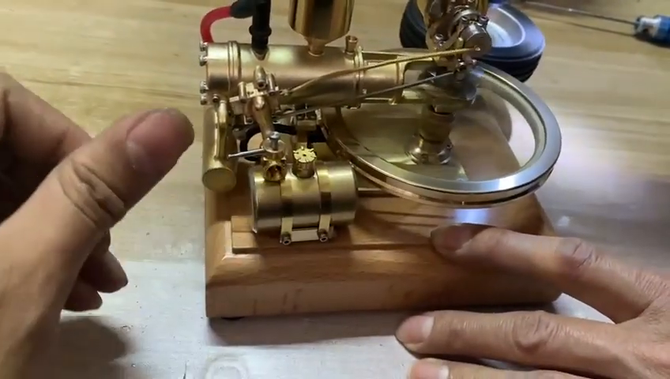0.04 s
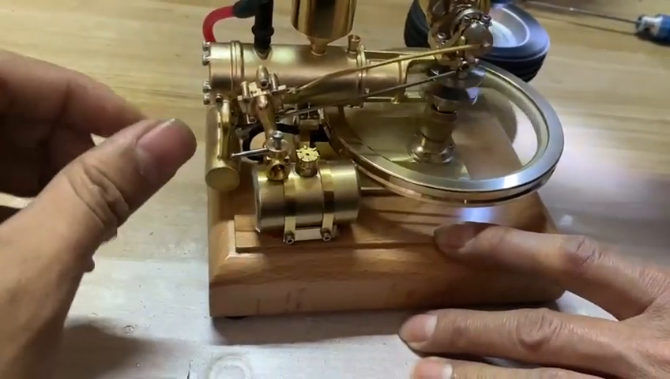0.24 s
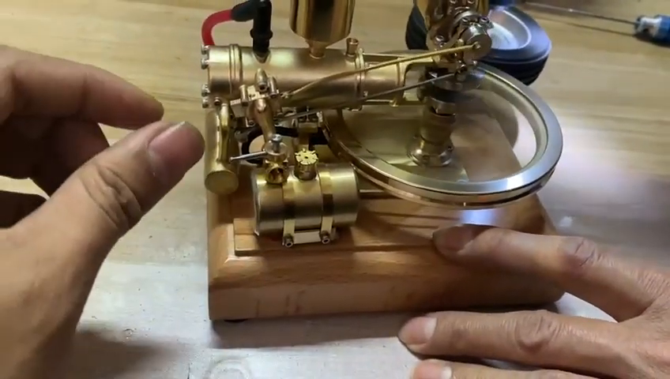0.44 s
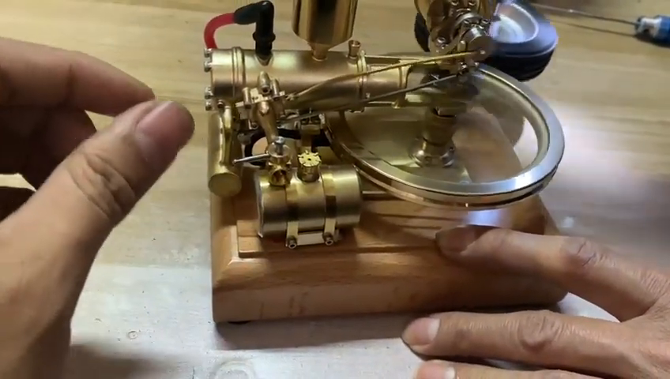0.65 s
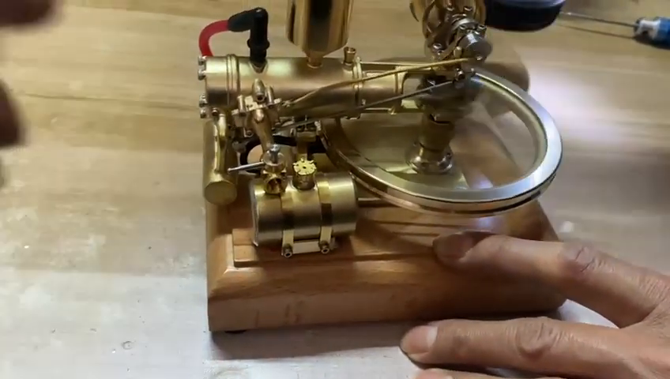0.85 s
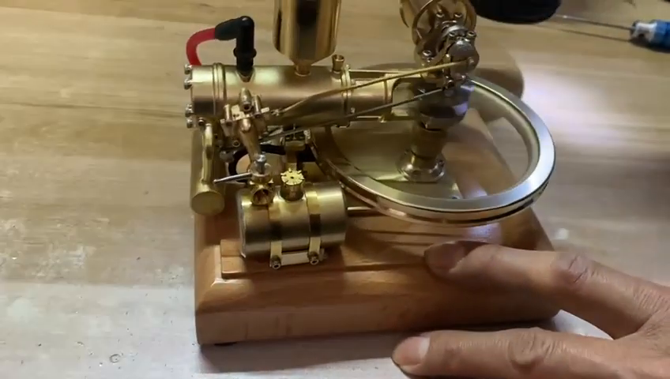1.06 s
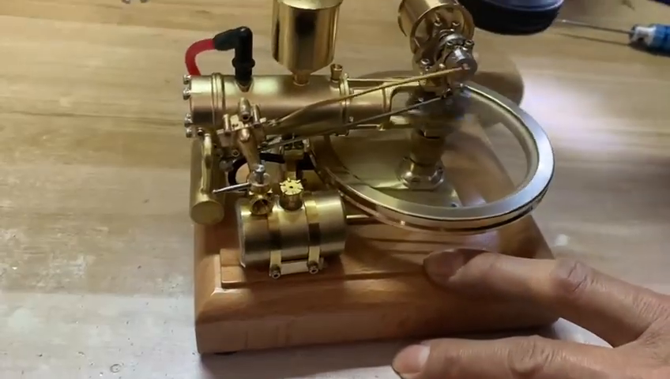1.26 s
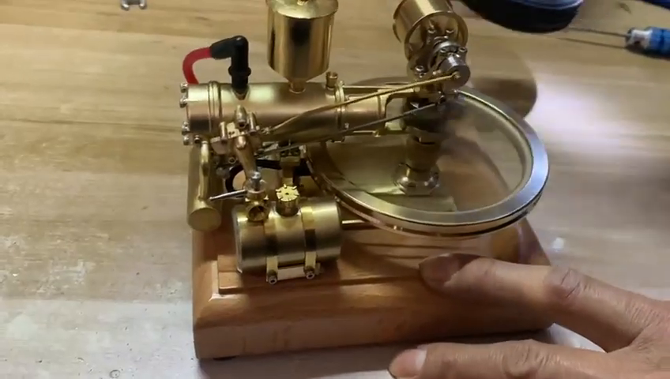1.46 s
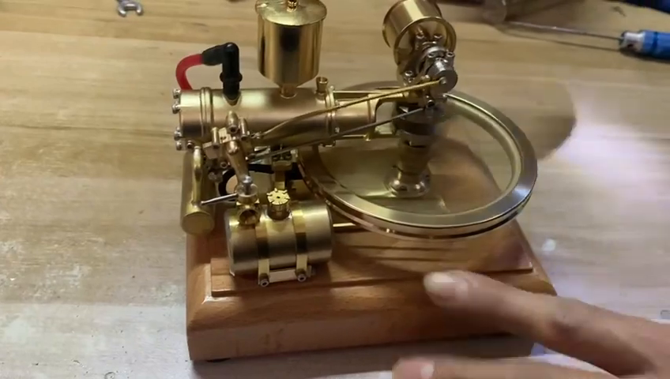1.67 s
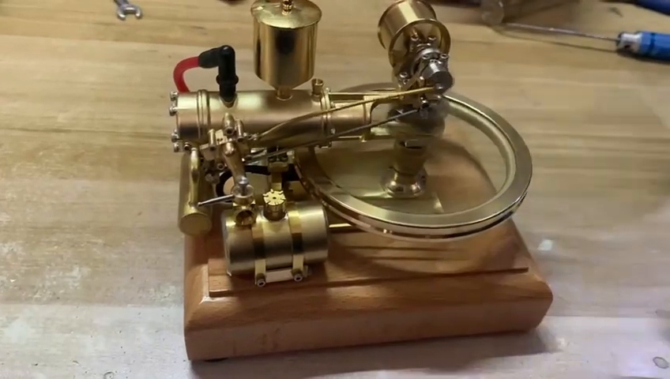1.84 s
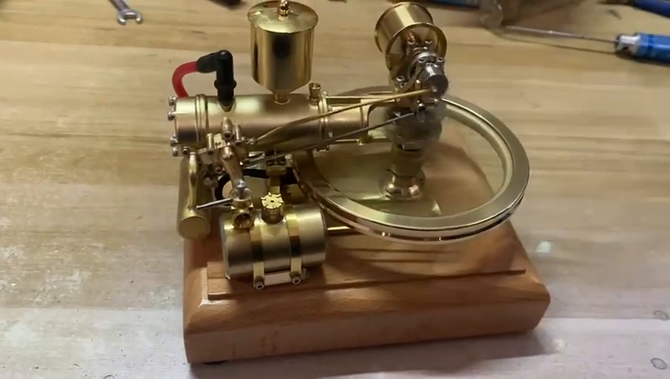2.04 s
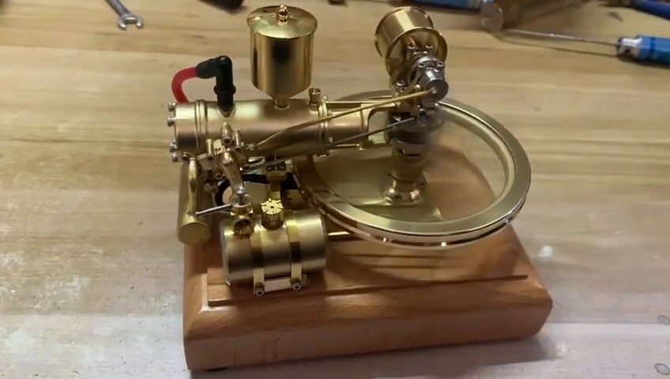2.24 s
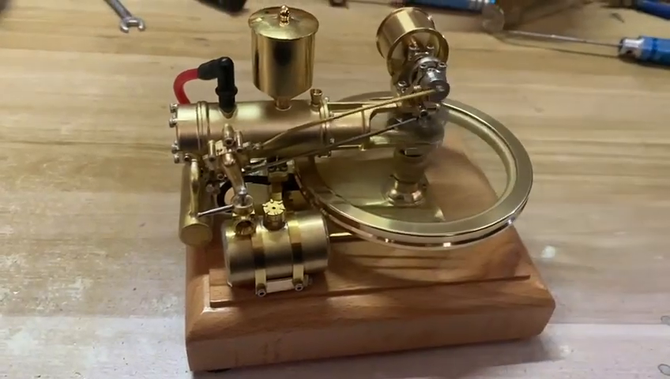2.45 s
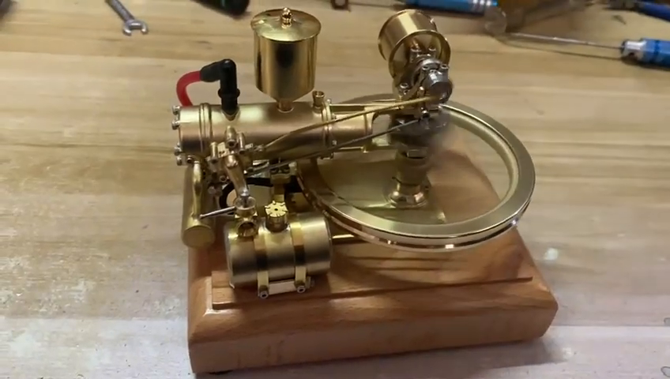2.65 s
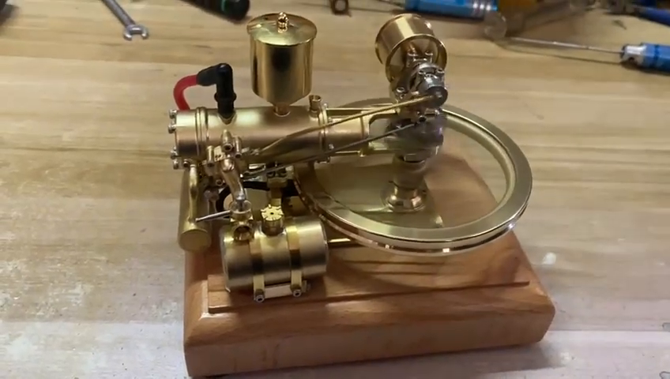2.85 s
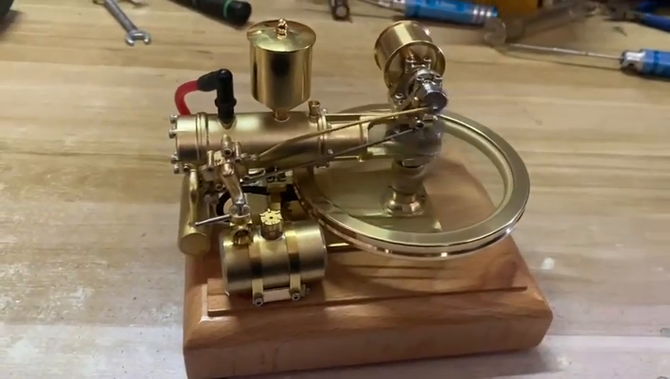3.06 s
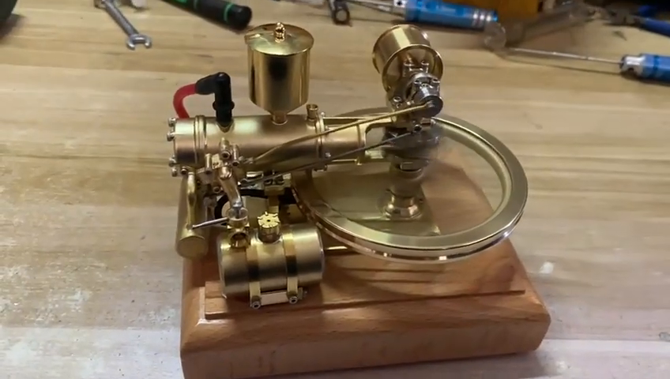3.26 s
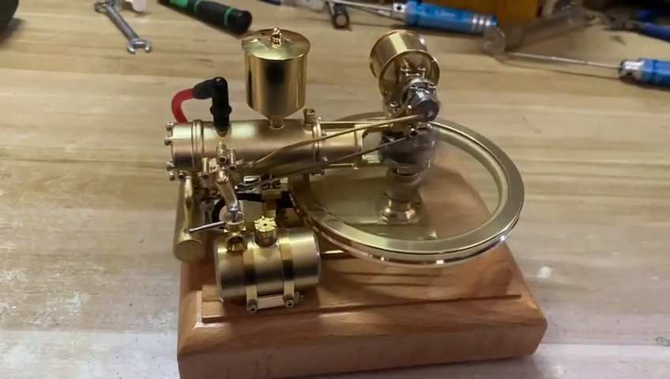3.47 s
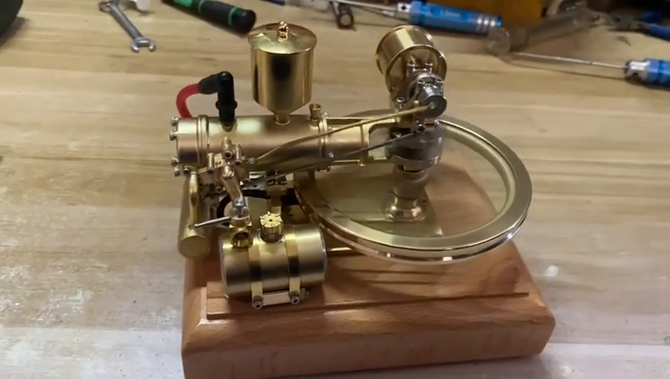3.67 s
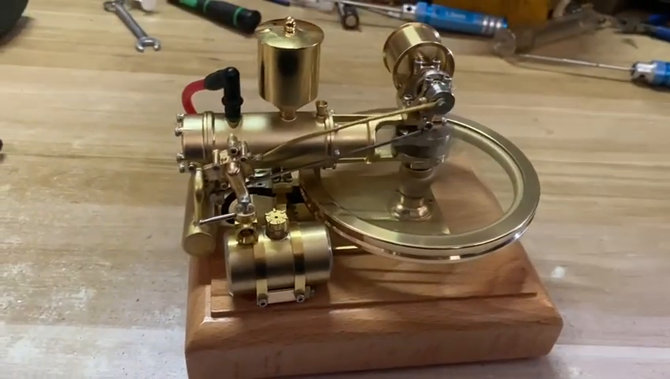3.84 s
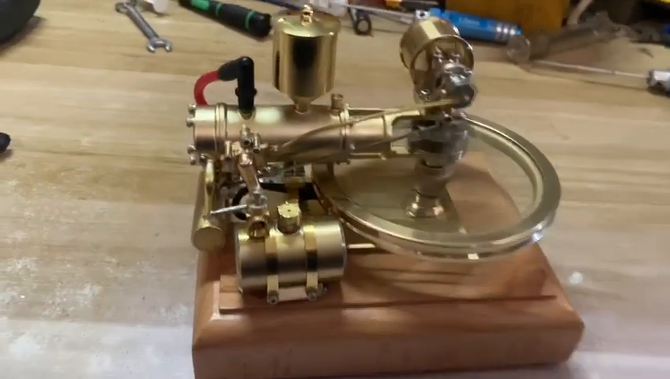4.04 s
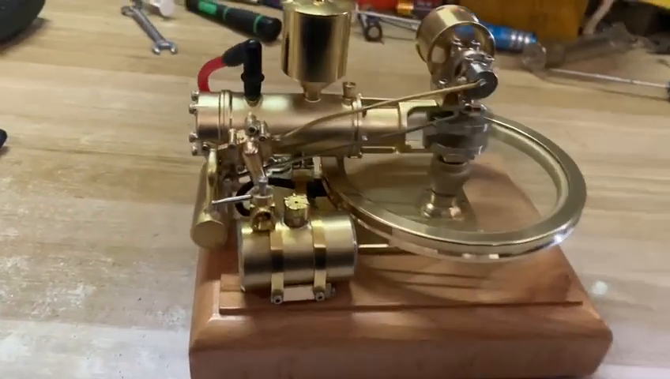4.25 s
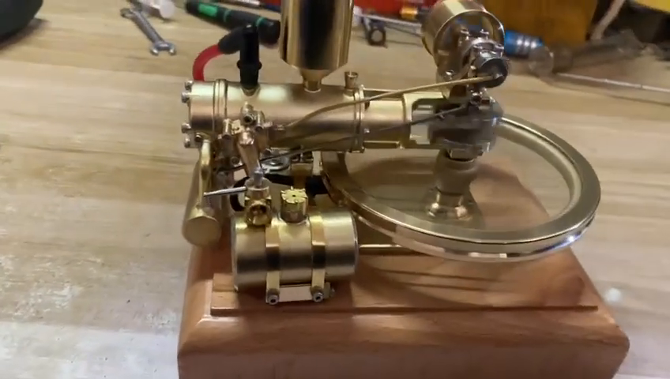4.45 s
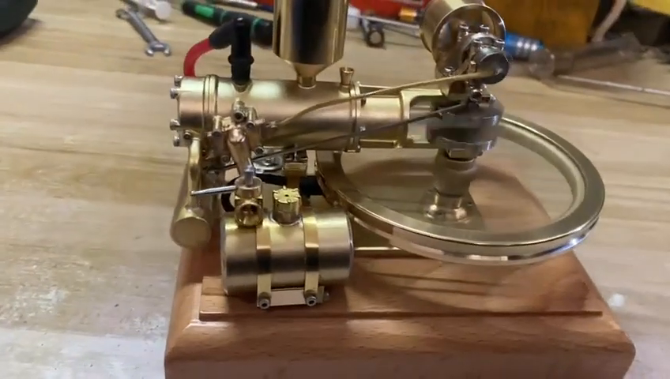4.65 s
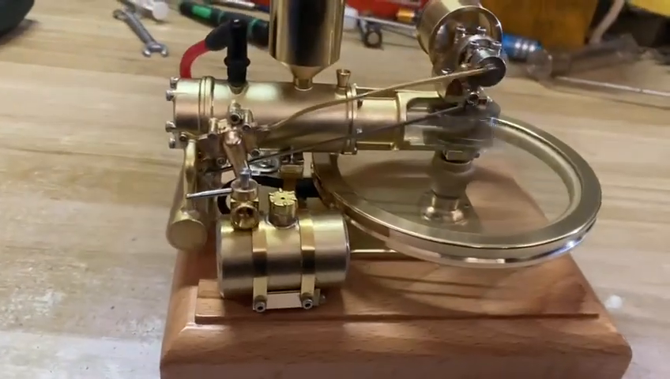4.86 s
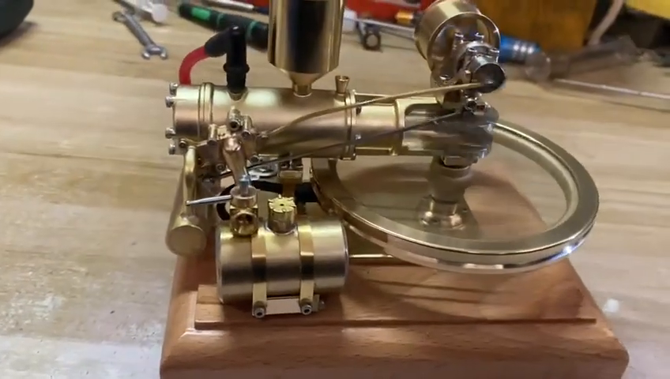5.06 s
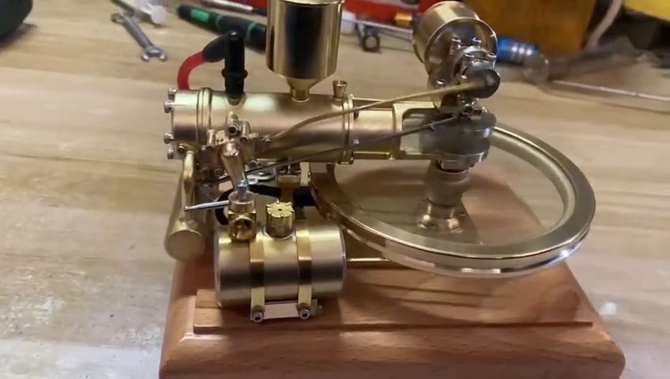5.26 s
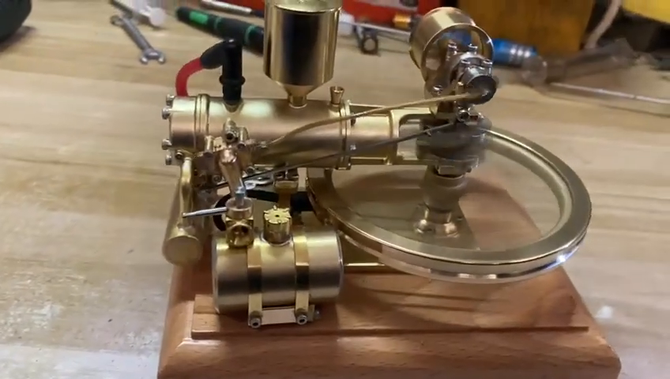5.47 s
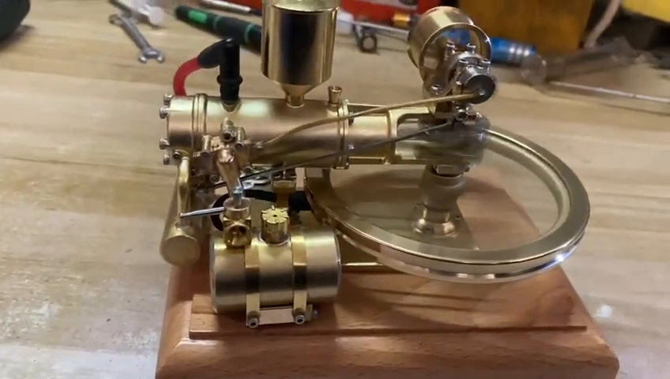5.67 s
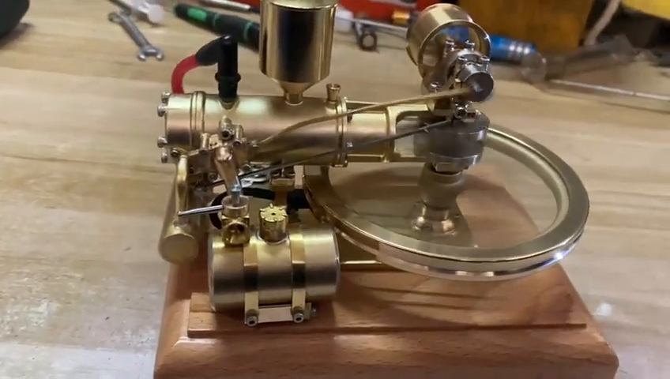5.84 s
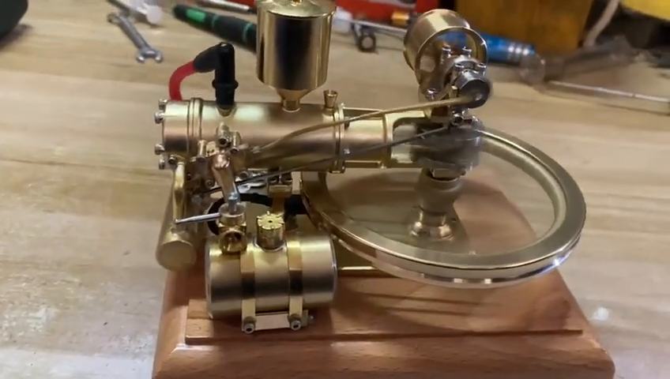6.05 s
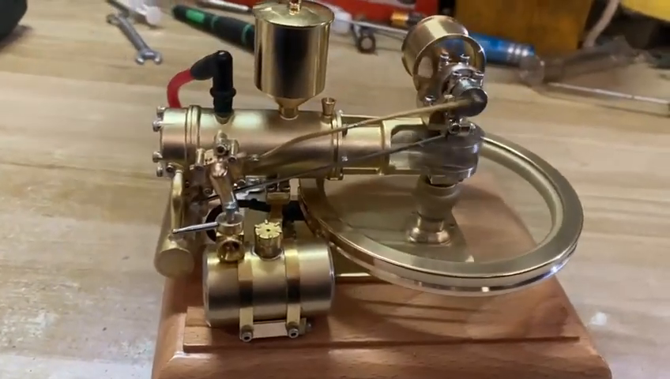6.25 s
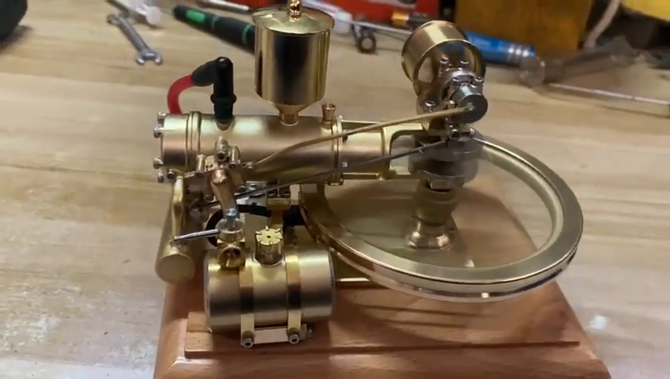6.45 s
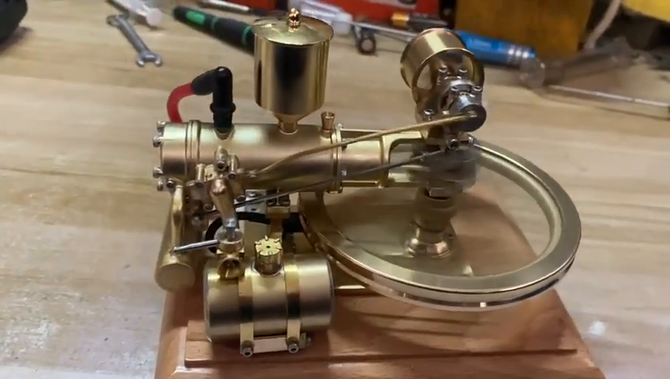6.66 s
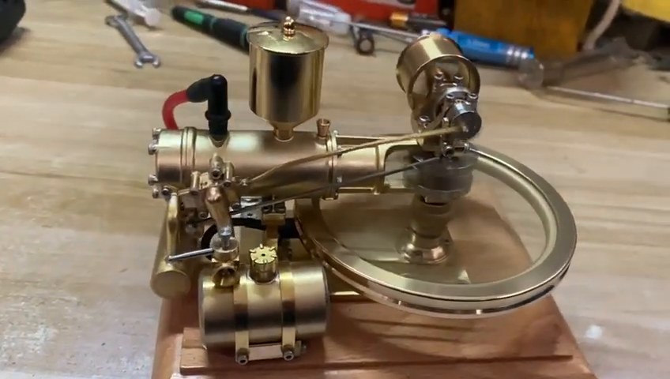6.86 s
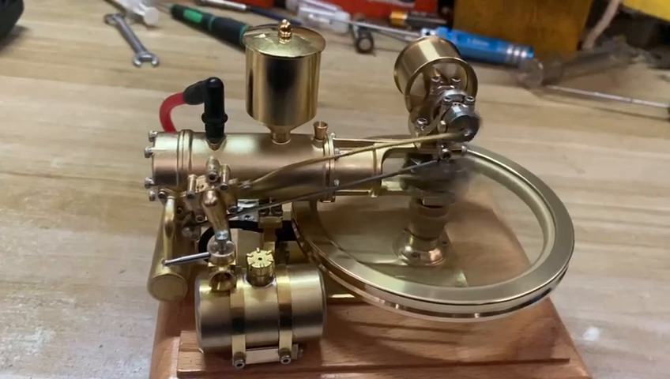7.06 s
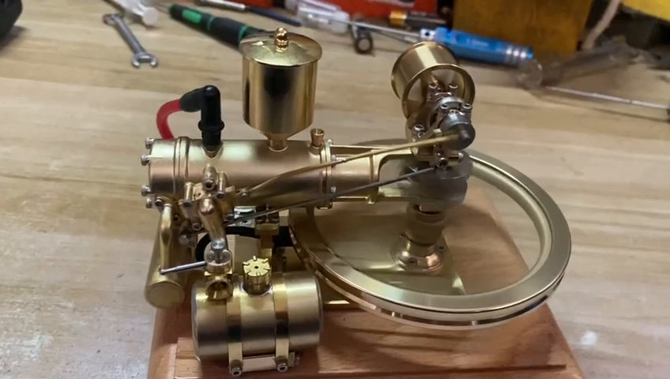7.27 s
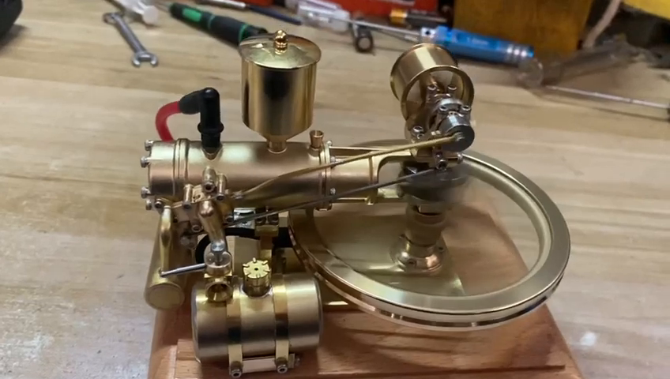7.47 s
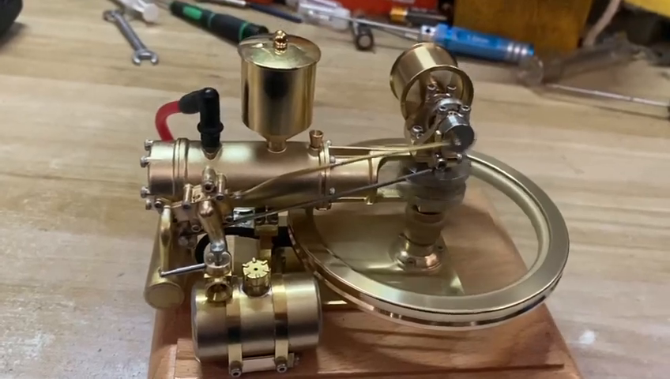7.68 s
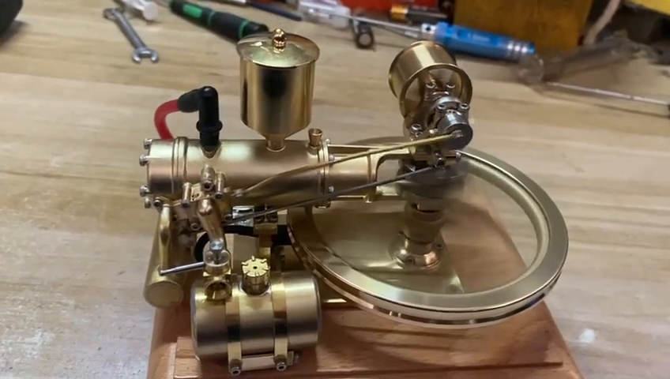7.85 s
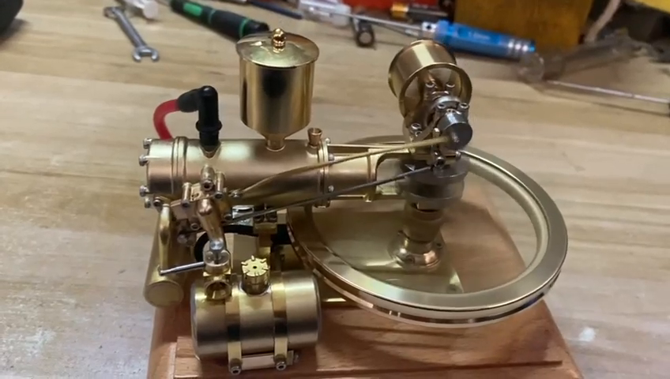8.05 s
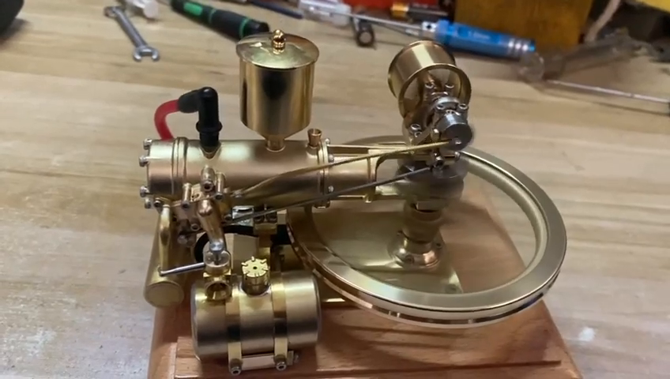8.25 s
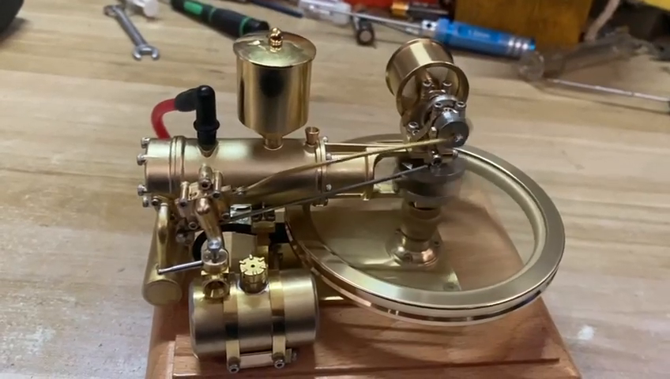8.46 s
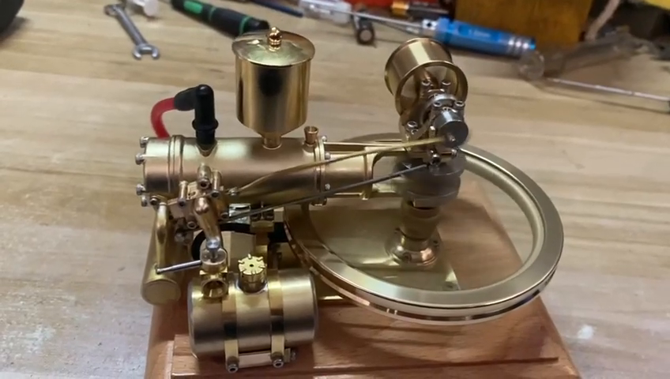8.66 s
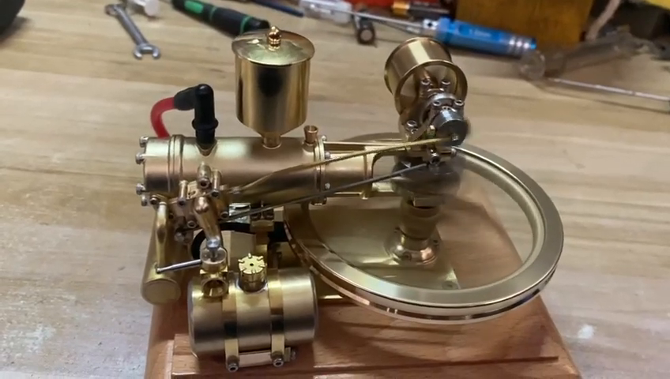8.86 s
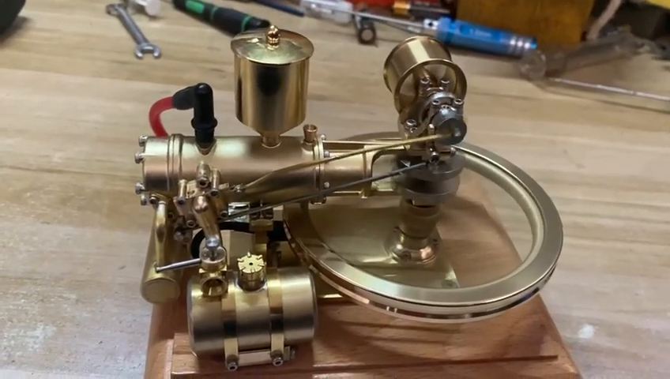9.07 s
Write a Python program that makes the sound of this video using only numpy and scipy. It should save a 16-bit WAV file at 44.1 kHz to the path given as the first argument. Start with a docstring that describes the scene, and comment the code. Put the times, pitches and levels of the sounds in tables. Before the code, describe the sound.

An electric starter whines and stops as a miniature four-stroke engine catches, its sharp exhaust pops quickening into a steady, ticking chug.

```python
"""Model engine on a wooden bench

A small brass four-stroke gathers speed, close to a two-port microphone. Each crank turn gives
an exhaust pop (loud when it fires), a valve clack and a puff of air. Nearby, an electric hand
tool whines and brakes to a halt at about 1.3 s. A few knocks ring the bench in the first half."""
import sys
import numpy as np
from scipy import signal
from scipy.fft import rfft, irfft, next_fast_len
from scipy.io import wavfile
from scipy.ndimage import uniform_filter1d, map_coordinates

SR = 44100
rng = np.random.default_rng(int(sys.argv[2]) if len(sys.argv) > 2 else 0)


def int16_out(signal):
    """Quantize to a 16-bit WAV file."""
    q = np.round(np.clip(np.atleast_2d(signal).T, -1, 1) * 32767)
    wavfile.write(sys.argv[1], SR, q.astype(np.int16))


N = 401751
TIME = np.arange(N) / SR


def amp(db):
    return 10 ** (np.asarray(db) / 20)


def unit(x):
    return x / np.sqrt(np.mean(x ** 2) + 1e-20)


def along(points, hz):
    """Interpolate (f/Hz, value) points on a log axis."""
    f, v = np.transpose(points)
    return np.interp(np.log(hz + 1), np.log(f + 1), v)


def curves(rows):
    """One value per sample for each column after the time."""
    s, *cols = np.transpose(rows)
    return [np.interp(TIME, s, c) for c in cols]


def wobble(rate):
    """A smooth random curve, rate knots a second."""
    return map_coordinates(rng.standard_normal(int(N * rate / SR) + 4), [TIME * rate])


def filtered(x, response):
    """Pass x through a complex response of frequency."""
    m = next_fast_len(N + SR // 2)
    return irfft(rfft(x, m) * response(np.fft.rfftfreq(m, 1 / SR)), m)[..., :N]


def modes(table):
    """Causal resonances with alternating signs, from rows of f/Hz, width/Hz, level/dB."""
    return lambda f: sum((-1) ** k * amp(db) * 1j * f * width / (hz * hz - f * f + 1j * f * width)
                         for k, (hz, width, db) in enumerate(table))


def lag(f, late, cycles=0):
    """A delay in seconds plus one that holds low tones back by some cycles."""
    return np.exp(-2j * np.pi * (f * late + cycles * np.log(f + 30)))


def noise(spectrum):
    """Coloured noise of rms 1."""
    return unit(filtered(rng.standard_normal(N), lambda hz: amp(along(spectrum, hz))))


def ringing_noise(table):
    """Noise through resonances, rms 1."""
    return unit(filtered(rng.standard_normal(N), modes(table)))


def impulses(times, sizes):
    """Single-sample blows at times in seconds."""
    out = np.zeros(N)
    out[(times * SR).astype(int)] = sizes
    return out


def hump(phase, start, peak, end):
    """A window within each turn; it opens abruptly if peak lies before start."""
    return np.sin(np.pi / 2 * np.interp(phase % 1, [start, peak, end], [0, 1, 0])) ** 2


# Broad noise of the background and of the gears: f/Hz, density/dB
WHIRR_SPECTRUM = [(40, -7.5), (200, -8.5), (1000, -4.5), (2000, -8), (2600, -15), (4500, -10.5),
                  (6500, -10), (8700, -25), (10500, -10.5), (15300, -22), (16200, -50)]

def noise_floor():
    """A faint steady hiss, independent in each channel."""
    return amp(-49) * np.array([noise(WHIRR_SPECTRUM), noise(WHIRR_SPECTRUM)])


# Decay of the room, and of the bench top and clutter near the microphone: f/Hz, t60/s
ROOM_DECAY = [(100, 0.064), (1000, 0.39), (10000, 0.14)]
NEAR_DECAY = [(100, 0.0096), (1000, 0.043), (10000, 0.0071)]

def reflections(x, decay):
    """Diffuse stereo reflections in which each frequency dies at its own speed."""
    hz, t, spectra = signal.stft(rng.standard_normal((2, SR // 2)), SR, nperseg=256)
    tail = signal.istft(spectra * amp(-60 * t / along(decay, hz)[:, None]), SR, nperseg=256)[1]
    delayed = np.pad(x, (120, 0))[None]
    return signal.fftconvolve(delayed, tail / np.linalg.norm(tail[0]), axes=1)[:, :N]


# Blows on the bench: t/s, level/dB, relative crack level/dB
BLOWS = [(0.45, -26, -14), (0.798, -24, -14), (2.462, -6.5, -2), (2.471, -0.5, -15.5), (2.544, -15.5, -8),
         (2.751, -19, -12), (2.809, -35, -14), (4.137, -23, -14)]
# Modes of the wooden top: f/Hz, level/dB, t60/s
BENCH_MODES = [(60.6, -7, 0.062), (85.3, 0.5, 0.15), (131, -5.5, 0.12), (187, -1.5, 0.067),
               (305.6, -12, 0.17), (586, -8, 0.048), (778, -14.5, 0.11)]

def bench_knocks():
    """Soft blows ring the bench top; the contact gives a short crack and a duller rattle."""
    out, t = np.zeros(N + SR), np.arange(SR // 2) / SR
    attack = 1 - np.exp(-t / 0.00051)
    dull_noise = lambda size: uniform_filter1d(rng.standard_normal(len(t)), size)
    for s, db, crack_db in BLOWS:
        ring = sum(amp(level + rng.normal(0, 0.85) - 60 * t / t60) * np.sin(2 * np.pi * hz * t)
                   for hz, level, t60 in BENCH_MODES)
        crack = dull_noise(5) * amp(crack_db + 11 - 60 * t / 0.011)
        rattle = dull_noise(18) * amp(crack_db + 13.5 - 60 * t / 0.095)
        out[round(s * SR):][:len(t)] += amp(db - 6) * (ring + crack + rattle) * attack
    return filtered(out[:N], lambda f: lag(f, -0.00115, 0.45))


# The tool's motor before braking: t/s, rotation f/Hz, level/dB
MOTOR_RUN = [(0, 428.5, -24.5), (.19, 428.8, -24.5), (.28, 433.5, -24.5), (.38, 433.3, -24.5),
             (.54, 430.6, -24.7), (.9, 432.3, -26.5), (1.2, 433, -26.3)]

def tool_motion():
    """Motor speed, overall level and relative whine level: steady, then braked and fading out."""
    brake_s, whine_end_s, halt_s, rattle_end_s = 1.257, 1.289, 1.312, 1.355
    since = lambda s: np.maximum(TIME - s, 0)
    hz, db = curves(MOTOR_RUN)
    hz = np.maximum(hz - 3500 * since(brake_s), 110)
    swell_db = 3.5 * np.minimum(since(brake_s) / (halt_s - brake_s), 1)
    rattle_db = -43 - 1700 * since(rattle_end_s)
    db = np.maximum(db + swell_db - 850 * since(halt_s), rattle_db)
    whine_db = 2.5 - np.minimum(1200 * since(whine_end_s), 60)
    return hz, db, whine_db


# Motor tones: multiple of the rotation rate, level/dB
MOTOR_ORDERS = [(1, -23), (3, -30), (4, -14), (5, -26), (6, -28), (8, -6.5), (11, -30), (19, -24)]
# Fan noise: f/Hz, density/dB
FAN_SPECTRUM = [(40, -17), (80, -6), (300, -12), (800, -7), (1500, -11), (2400, -8.5), (3800, -5.5),
                (5200, -9), (6500, -9), (7500, -8), (9500, -7), (12000, -8.5), (14000, -17), (15400, -16),
                (15900, -50)]
# Resonances of the housing and of the braking scrape: f/Hz, width/Hz, level/dB
HOUSING_MODES = [(1680, 160, 9), (3620, 270, -15), (4410, 100, 8), (6500, 320, 5), (8210, 150, 8.5),
                 (8320, 140, 6)]
SCRAPE_MODES = [(860, 69, 2), (2700, 130, 3.5), (4800, 580, -4)]

def hand_tool():
    """Nearby, a motor whines over fan noise in its housing; it breaks up and scrapes as it stops."""
    hz, db, whine_db = tool_motion()
    slowing = 1 - hz / hz.max()
    angle = 2 * np.pi * np.cumsum(hz * (1 + 0.05 * slowing * wobble(250))) / SR
    whine = np.zeros(N)
    for order, level in MOTOR_ORDERS:
        rms = amp(level + 0.7 * wobble(40.3) + 5.2 * slowing * (0.5 + wobble(72.4)))
        phase = order * (angle + 0.013 * wobble(62.5)) + rng.uniform(0, 7.8)
        whine += np.sqrt(2) * rms * np.sin(phase)
    chop = 1 + 0.27 * np.cos(angle)  # the commutator chops the noise once a turn
    fan = unit(filtered(chop * noise(FAN_SPECTRUM), lambda f: 1 + np.abs(modes(HOUSING_MODES)(f))))
    scrape = slowing * amp(4 + 3.5 * wobble(80)) * ringing_noise(SCRAPE_MODES)
    flutter = amp(wobble(20.15) + 0.54 * wobble(120))
    return amp(db) * (amp(whine_db) * whine + scrape + fan * flutter)


# Engine firings: t/s, pressure step into the muffler/dB, blow on the valve seat/dB
FIRING_STROKES = [(0.2005, 23.5, 10), (0.57, 19, 14), (0.9241, 11, 4), (1.1516, 23, 6), (1.3685, 9, 11),
                  (1.5764, 18, 6), (1.777, 14.5, 11), (1.9696, 18.5, 5), (2.1574, 12, 20),
                  (2.338, 15.5, 19), (2.5141, 23.5, 20), (2.6865, 24.5, 14), (2.8567, 25.5, 3),
                  (3.0245, 24.5, 5), (3.1916, 25.5, 11), (3.3554, 24, 10.5), (3.5188, 16.5, 17.5),
                  (3.681, 25, 6), (3.845, 26, 13.5), (4.0068, 26, 4), (4.1676, 23.5, 18),
                  (4.3266, 25.5, 19.5), (4.485, 22.5, 17), (4.641, 26.5, 4), (4.7962, 26, 8),
                  (4.95, 23.5, 16), (5.1025, 26, 12), (5.255, 26, 14), (5.4067, 25, 12), (5.5583, 26, 10),
                  (5.7089, 26, 19), (5.8586, 26, 13), (6.007, 26, 17), (6.155, 25.5, 7), (6.3029, 26, 16),
                  (6.5245, 18, 19), (6.6723, 26.5, 5), (6.819, 23, 18), (6.9671, 24.5, 9), (7.1154, 26, 13),
                  (7.261, 26, 10), (7.4077, 25, 10), (7.5525, 26, 7), (7.6975, 25, 13), (7.842, 24, 15),
                  (7.9866, 25.5, 6), (8.1294, 27, 4), (8.2714, 25, 11), (8.4137, 26.5, 6),
                  (8.5574, 24.5, 19), (8.699, 27, 6), (8.841, 26, 15), (8.9833, 26, 12)]
# Rough crank speed, which sets the whole turns between firings: t/s, f/Hz
CRANK_SPEED = [(0, 8), (2.5, 11.5), (5, 13), (9, 14)]

def crank():
    """Firing times (padded at both ends), the turns done by each, and the turns at every sample."""
    s = np.transpose(FIRING_STROKES)[0]
    turns_between = np.round(np.diff(s) * np.interp(s[1:], *np.transpose(CRANK_SPEED)))
    turns = np.cumsum(np.r_[0, 2, turns_between, 2])
    times = np.r_[s[0] - (s[1] - s[0]) * 2 / 3, s, 2 * s[-1] - s[-2]]
    return times, turns, np.interp(TIME, times, turns)


def by_speed(full_db, db_per_hz, at_s=None):
    """A level in dB that follows crank speed, at every sample or at the given times."""
    full_speed_hz = 14
    times, turns, _ = crank()
    speed_hz = np.interp(TIME, (times[1:] + times[:-1]) / 2, np.diff(turns) / np.diff(times))
    db = full_db + db_per_hz * (speed_hz - full_speed_hz)
    return db if at_s is None else db[(at_s * SR).astype(int)]


# Rushing gas at intake and exhaust: f/Hz, density/dB
GAS_SPECTRUM = [(150, -44), (500, -8), (1500, -26), (2500, -12.5), (4500, -10.5), (6000, -3), (7200, -4),
                (8700, -16.5), (10300, 4.5), (12200, -6), (13300, -1), (15300, -11.5), (16200, -47)]
# Resonances of the engine frame: f/Hz, width/Hz, level/dB
FRAME_MODES = [(56, 20, 4.5), (77, 26, 1.5), (200, 53, 3.5), (405, 620, -10), (726, 135, -6),
               (864, 80, -4.5), (1138, 120, 0), (1515, 66, -10.5), (1888, 84, -1.5), (3720, 200, -12.5)]

def valve_gear():
    """Once a turn the intake puffs and a tappet clacks against the frame."""
    _, turns, phase = crank()
    per_turn = lambda db: amp(db * rng.standard_normal(int(turns[-1]) + 1))[phase.astype(int)]
    intake = hump(phase, 0.27, 0.34, 0.61) + amp(-6) * hump(phase, 0.19, 0.15, 0.63)
    puff = per_turn(1.2) * intake * amp(2.8 * wobble(250)) * noise(GAS_SPECTRUM)
    taps = hump(phase, 0.206, 0.193, 0.37) * amp(1.7 * wobble(370)) * rng.standard_normal(N)
    clack = unit(filtered(per_turn(1.1) * taps, modes(FRAME_MODES)))
    return amp(by_speed(-28, 1.2)) * (puff + amp(-10.5) * clack)


# Hum of the bench under the engine: t/s, level/dB
BENCH_HUM = [(0, -56), (3.5, -56), (4.4, -49), (4.7, -42), (6.5, -41.5), (9.11, -40)]
# Resonances of the wooden base: f/Hz, width/Hz, level/dB
BASE_MODES = [(80.5, 14, -2.5), (190, 17, -6.5)]

def running_gear():
    """Gears whirr through the frame, the bench hums at four times crank speed, the base shakes."""
    _, _, phase = crank()
    whirr_db, (hum_db,) = by_speed(-36, 1.5), curves(BENCH_HUM)
    teeth = noise(WHIRR_SPECTRUM) * amp(3.04 * wobble(150))
    whirr = unit(filtered(teeth, lambda f: amp(-10) + np.abs(modes(FRAME_MODES)(f))))
    whirr *= amp(whirr_db + 0.72 * wobble(30) + 0.66 * np.cos(2 * np.pi * (phase - 0.4)))
    hum = np.sqrt(2) * amp(hum_db + wobble(6)) * np.sin(2 * np.pi * 4 * phase)
    shake = (amp(whirr_db - 12.5) + amp(hum_db - 6.5)) * amp(3.3 * wobble(6))
    return whirr + hum + shake * ringing_noise(BASE_MODES)


# Resonances of the linkage pin: f/Hz, width/Hz, level/dB
PIN_MODES = [(3450, 220, 0), (3900, 200, -5)]

def linkage_tick(blows):
    """A pin ticks as it takes up its play."""
    return amp(-11) * filtered(blows, lambda f: modes(PIN_MODES)(f) * lag(f, 0.003))


def valve_chatter(blows):
    """The valve chatters on its seat: a short noise burst pings the steel."""
    burst = filtered(blows, lambda f: lag(f, 0.00095) / (1 + 2j * np.pi * f * 0.00072) ** 2)
    return filtered(burst * rng.standard_normal(N), modes([(5530, 400, 10.2), (5926, 147, 19.6)]))


def gas_jet(steps):
    """Hot gas tears out with each pop."""
    burst = filtered(steps, lambda f: lag(f, -0.00048) / (1 + 2j * np.pi * f * 0.0021) ** 2)
    return amp(-2.5) * burst * noise(GAS_SPECTRUM)


def pipe_bark(fire_s):
    """The pipe mouth barks at each firing, harder while the engine is slow."""
    blows = impulses(fire_s, amp(by_speed(-12, -2.2, fire_s)))
    return filtered(blows, lambda f: modes([(1800, 260, 0)])(f) * lag(f, 0.0012))


# Resonances of the muffler cavity, the low pipe and base, the muffler wall: f/Hz, width/Hz, level/dB
MUFFLER_MODES = [(1236.5, 163, 5.5), (1414, 200, -10), (1790, 82, -12), (2060, 94, -9.5)]
PIPE_MODES = [(88.5, 31, 3.5), (167, 93, 4), (424, 205, 3), (769, 207, 2.5)]
WALL_MODES = [(1850, 150, 0.5), (2510, 160, 8.5), (3330, 320, -11)]

def exhaust(steps, thumps, cracks):
    """Each valve opening sends a pressure step through pipe and muffler; firings strike the wall too."""
    echo = lambda f: 1 + 0.57 * lag(f, 0.001806)  # the pipe end sends the step back once
    lift = lambda f: 1 / (1 + 1j * f / 1800) ** 2  # the valve takes a moment to open
    side_chamber = lambda f: 1 - 0.53 * modes([(950, 220, 0)])(f)  # swallows one band
    pop = filtered(steps, lambda f: modes(MUFFLER_MODES)(f) * echo(f) * lift(f) * lag(f, 0.00024, 0.2824))
    thump = filtered(thumps, lambda f: modes(PIPE_MODES)(f) * lag(f, 0.00023, 0.798))
    wall = filtered(cracks, lambda f: modes(WALL_MODES)(f) * echo(f) * lag(f, 0.0006))
    return filtered(pop + thump, side_chamber) + wall


def model_engine():
    """The close source: loud pops on firing turns, soft pops and ticks on idle ones, over the gears."""
    times, turns, _ = crank()
    fire_s, step_db, seat_db = np.transpose(FIRING_STROKES)
    scatter = rng.standard_normal((len(fire_s), 2))
    thump_db = by_speed(22.5, 1.07, fire_s) + 0.4 * scatter[:, 0]
    idle_turns = np.setdiff1d(np.arange(1, turns[-1]), turns)
    idle_s = np.interp(idle_turns - 0.025, turns, times)  # early: the wheel is fastest after a firing
    idle_db = by_speed(9.6, 1.13, idle_s) + 2.1 * rng.standard_normal(len(idle_s))
    idle = impulses(idle_s, amp(idle_db))
    steps = impulses(fire_s, amp(step_db)) + amp(-0.1) * idle
    thumps = impulses(fire_s, amp(thump_db)) + idle
    cracks = impulses(fire_s, amp(thump_db - 25.5 + 3 * scatter[:, 1]))
    metal = linkage_tick(idle) + valve_chatter(impulses(fire_s, amp(seat_db)))
    pops = exhaust(steps, thumps, cracks) + pipe_bark(fire_s) + gas_jet(steps)
    return pops + metal + valve_gear() + running_gear()


# Phase lead of the left microphone port: f/Hz, lead/rad
PORT_LEAD = [(0, 0), (2000, .9), (2600, .4), (6000, .7), (7400, 0), (8500, -3), (9400, -3.3), (10700, -6),
             (11700, -6.5), (12700, -9.2), (13800, -9.7), (14700, -12.4), (16500, -12.6)]
# Left port over right at a lean of 1: f/Hz, level/dB
PORT_TILT = [(60, 0), (200, 1.5), (700, 4), (1250, 7), (1900, -3), (2600, 3), (3700, 4), (6500, 2),
             (8000, 0), (16000, 0)]

def microphone_ports(x, lean):
    """The two ports hear a source with different level and phase."""
    half = np.array([[0.5], [-0.5]])
    lead = lambda f: np.interp(f, *np.transpose(PORT_LEAD))
    return filtered(x, lambda f: amp(lean * half * along(PORT_TILT, f)) * np.exp(1j * half * lead(f)))


def scene():
    """From the bench: the engine close and to the left, tool and knocks near centre, a little room."""
    engine, others = model_engine(), hand_tool() + bench_knocks()
    floor = noise_floor()
    near = amp(-12) * reflections(engine + others, NEAR_DECAY)
    room = amp(-16.5) * reflections(engine + others, ROOM_DECAY)
    return microphone_ports(engine, lean=1.44) + microphone_ports(others, lean=0.16) + near + room + floor


def record(dry):
    """The microphone loses the deepest bass; peaks round off at full scale; the top treble is cut."""
    top_hz = 16850
    low_cut = lambda f: 1j * f / (30 + 1j * f) * -f ** 2 / (44 ** 2 - f ** 2 + 1j * f * 50)
    thin = filtered(dry, low_cut)
    rounded = thin / (1 + np.abs(thin) ** 6) ** (1 / 6)
    return filtered(rounded, lambda f: f < top_hz)


dry = scene()
out = record(dry)
int16_out(out)
```